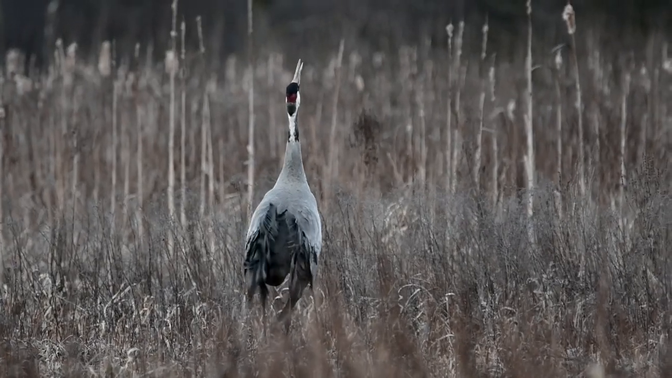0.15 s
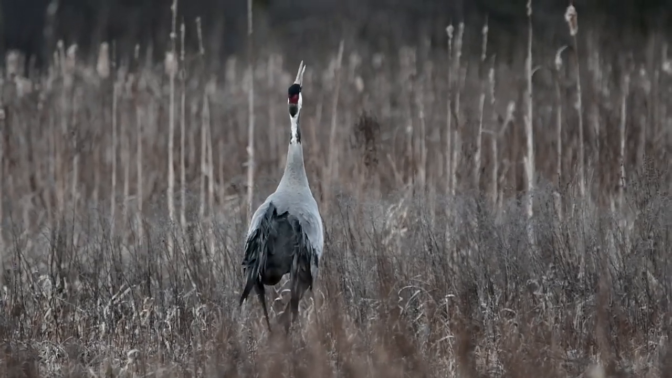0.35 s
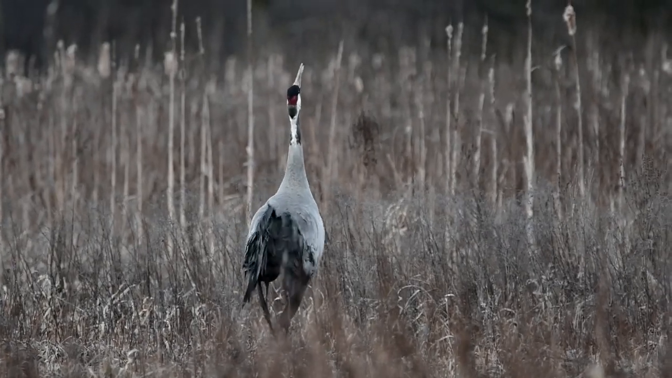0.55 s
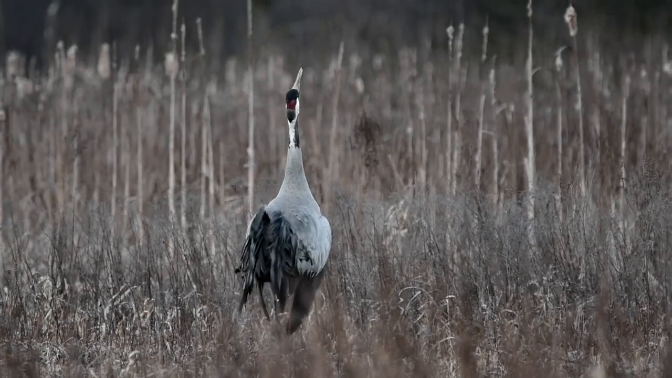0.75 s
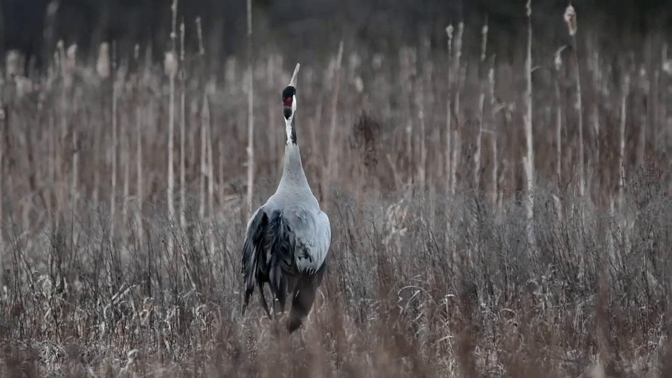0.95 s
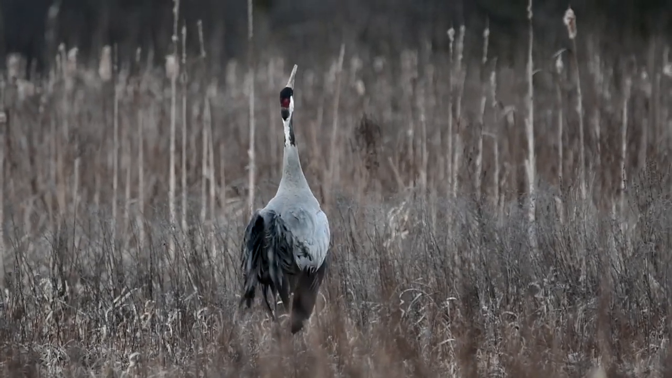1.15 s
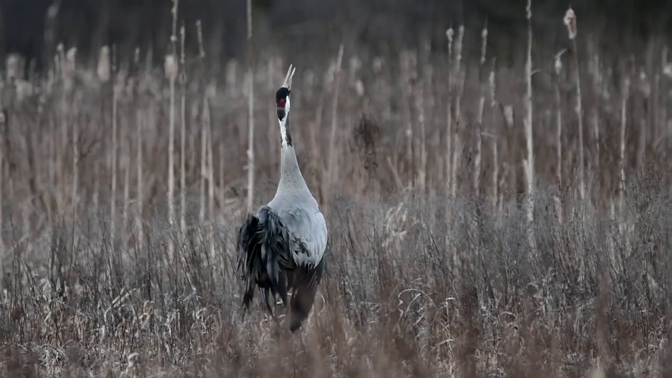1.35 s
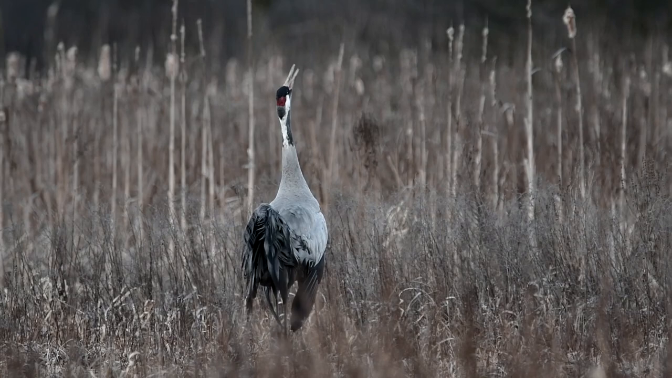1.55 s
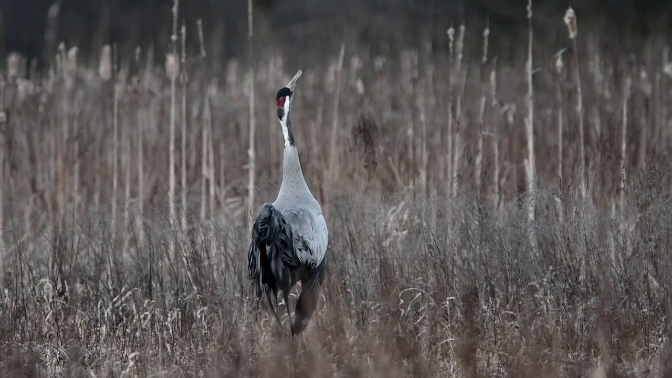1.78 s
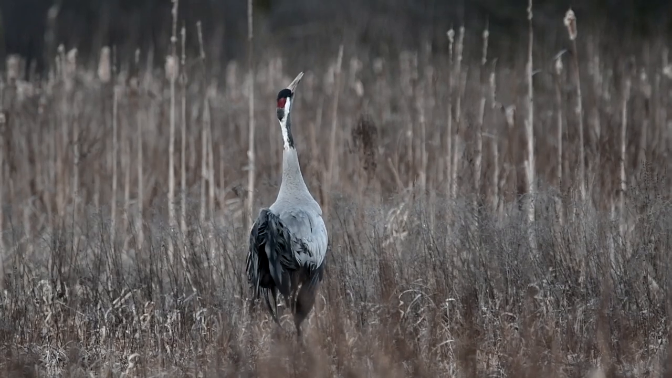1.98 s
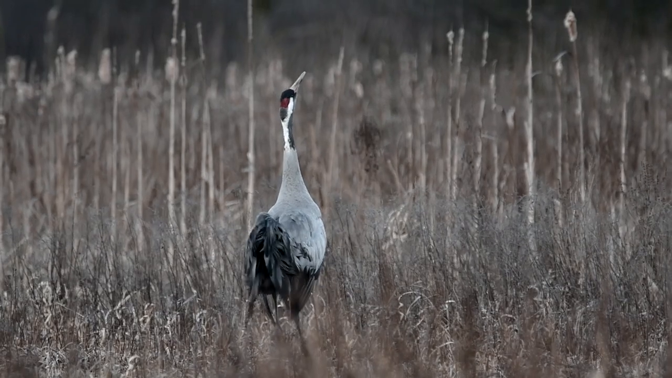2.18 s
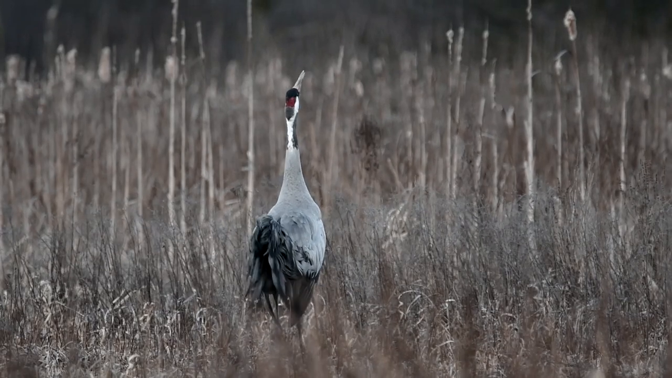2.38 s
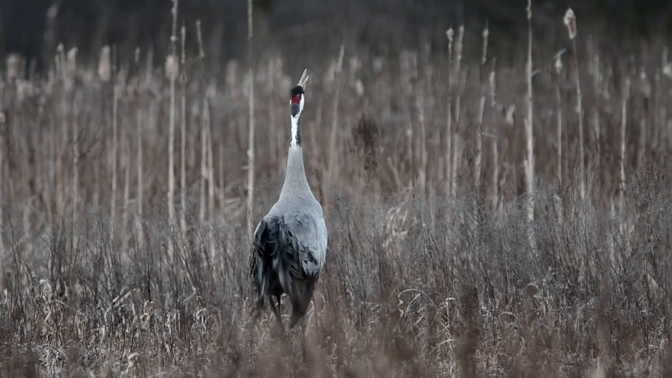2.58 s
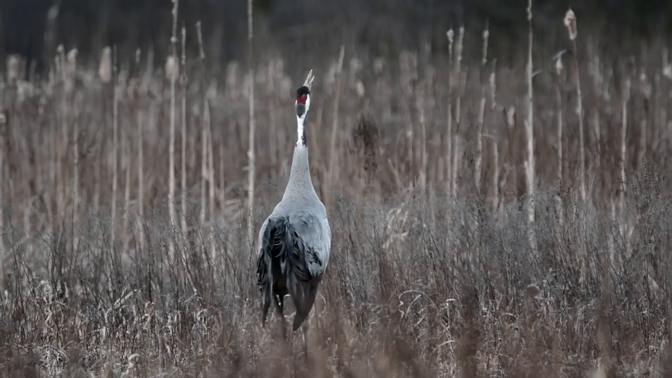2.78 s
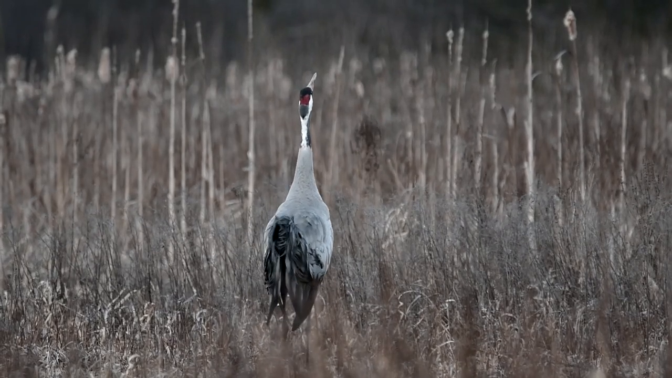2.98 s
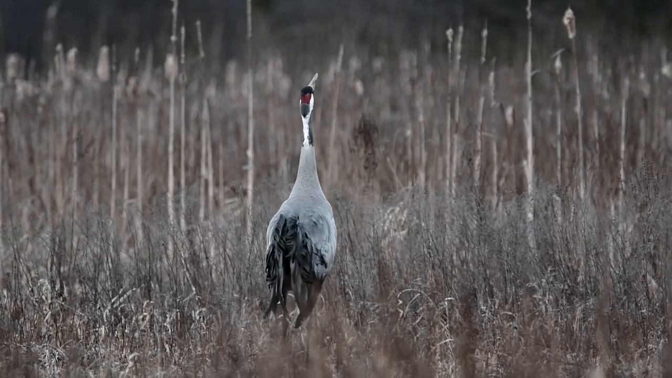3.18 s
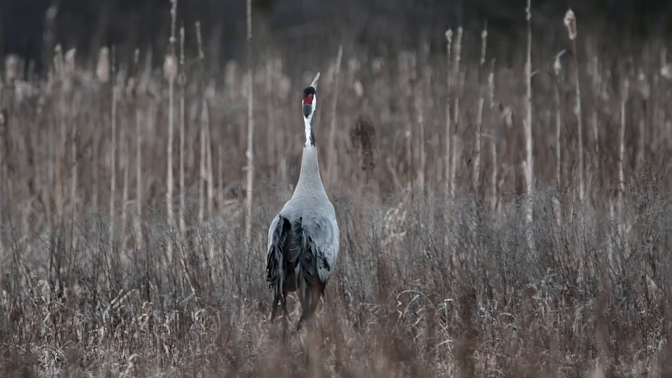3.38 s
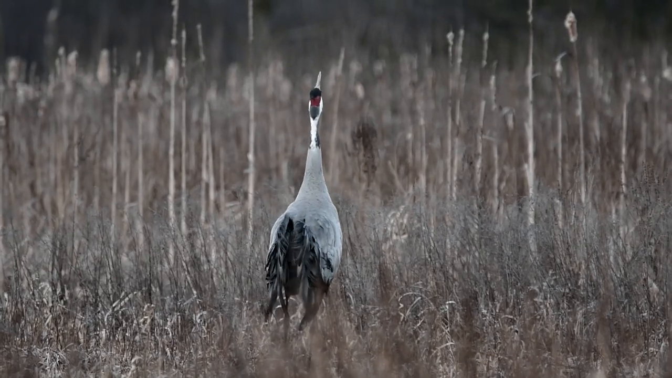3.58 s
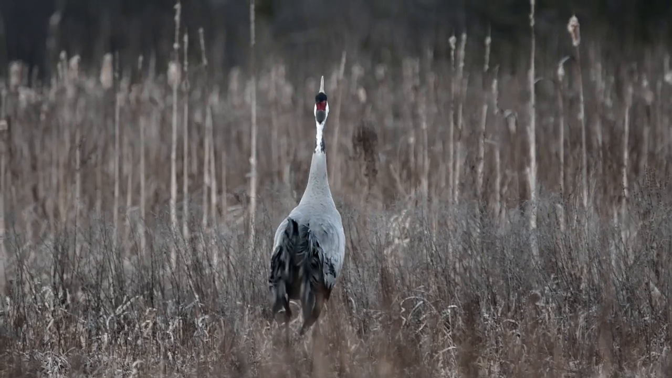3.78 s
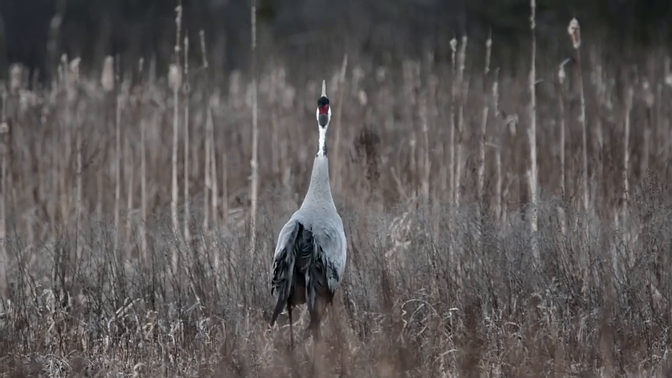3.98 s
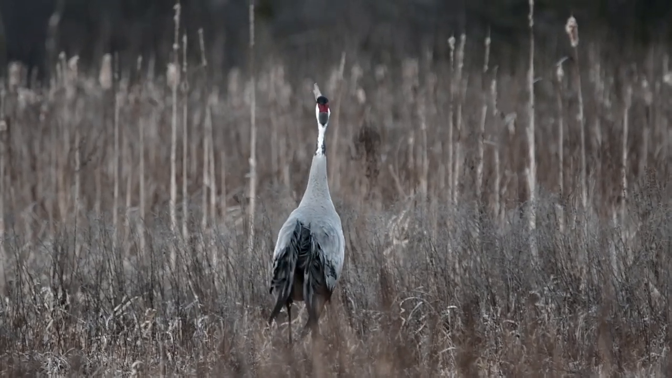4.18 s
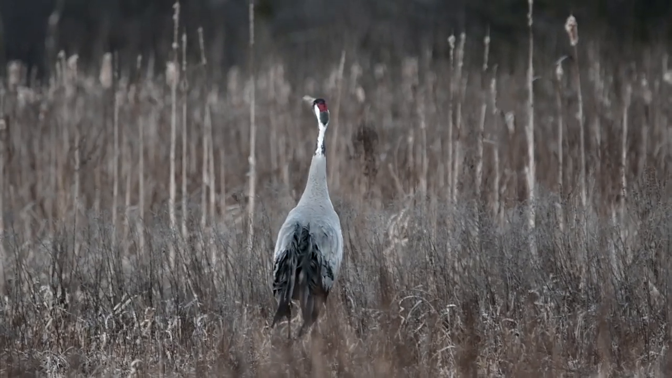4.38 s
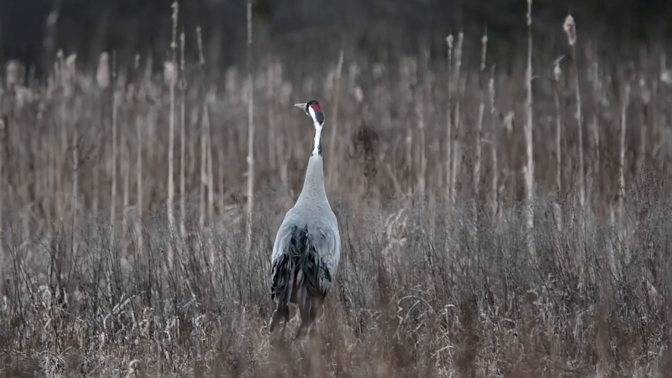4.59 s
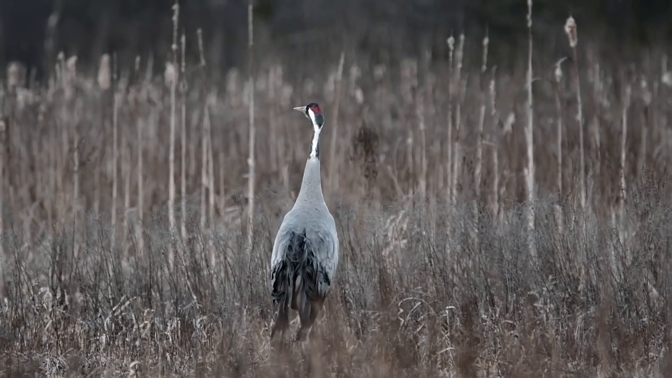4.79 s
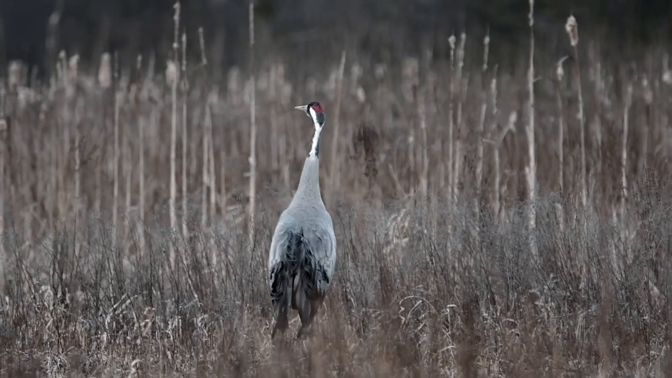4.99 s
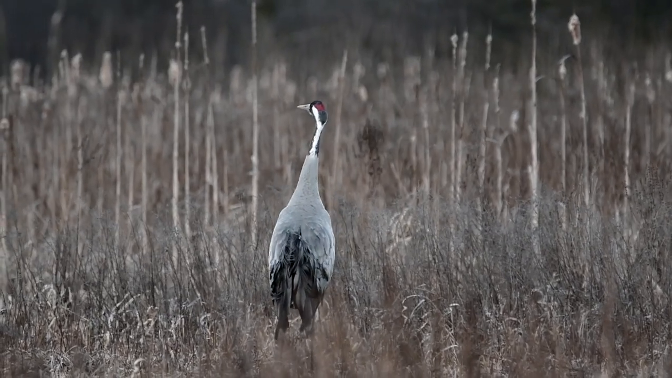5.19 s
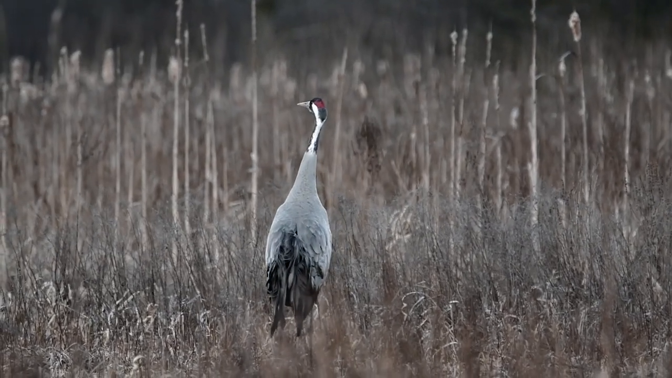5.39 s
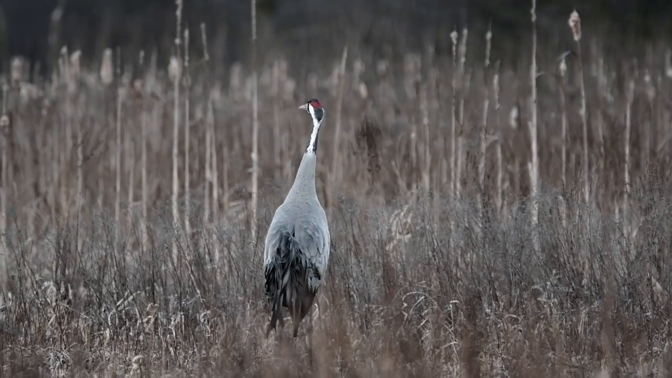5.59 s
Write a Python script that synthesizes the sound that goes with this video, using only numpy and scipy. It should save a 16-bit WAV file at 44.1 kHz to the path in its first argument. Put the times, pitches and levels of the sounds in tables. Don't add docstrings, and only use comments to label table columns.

```python
import sys
import numpy as np
from scipy import signal
from scipy.fft import rfft, irfft, next_fast_len
from scipy.io import wavfile
from scipy.ndimage import uniform_filter1d

SR = 44100
rng = np.random.default_rng(int(sys.argv[2]) if len(sys.argv) > 2 else 0)


def gain_from_db(level_db):
    decades = np.asarray(level_db, float) / 20
    return 10 ** decades


def log_audio(samples):
    frames = np.atleast_2d(samples).T
    limited = np.clip(frames, -1, 1)
    pcm = np.round(limited * 32767).astype(np.int16)
    wavfile.write(sys.argv[1], SR, pcm)


N = 249155

SHORT, CLIMB, HOLD, FALL = range(4)
# (start [s], end [s], settling time [s], hoarseness [0-1], stage)
MALE_STAGES = [(-.03, .068, .01, .06, CLIMB), (.068, .128, .004, .5, HOLD), (.218, .5, .022, .05, HOLD),
               (.5, .607, .004, .6, FALL), (1.104, 1.272, .014, .07, SHORT),
               (1.338, 1.402, .02, .55, CLIMB), (1.402, 1.502, .004, .06, HOLD),
               (1.502, 1.726, .004, .43, FALL), (2.322, 2.505, .022, .16, SHORT),
               (2.587, 2.645, .008, .85, CLIMB), (2.645, 2.722, .004, .5, HOLD),
               (2.722, 2.912, .004, .52, FALL), (3.598, 3.785, .04, .2, SHORT),
               (3.872, 3.964, .016, .12, CLIMB), (3.964, 4.03, .003, .28, HOLD),
               (4.03, 4.24, .004, .7, FALL)]
# (pitch [Hz], 2nd partial [dB], then fundamental, 3rd and 4th relative to it [dB])
MALE_VOICE = [(826, -36.5, -13.5, -8.5, -7), (880, -38.5, -3.5, 2, -7), (918, -31, -7.5, 2, -10),
              (817.7, -36, -7.5, -8.5, -5.5), (839.7, -35.5, -9.5, -12.5, -3), (861, -36, -4.5, -11.5, -11),
              (903.6, -28.5, -11, -19, -12.5), (834.6, -32.5, -6.5, -9.5, -7.5),
              (812.6, -38, -11, -13, -6.5), (843, -41, -8, -7.5, -11), (927, -35, -1.5, -5, -16),
              (866, -33.5, -5.5, -17.5, -13.5), (802, -40.5, -10.5, -7.5, -7.5),
              (838, -31.5, -17, -23.5, -7), (920, -29.5, -8, -8, -13.5), (834, -37, -8.5, -13, -9)]
BILL_OPENING = [0.8, 1.1, -0.8, -0.81, 0.19, -.8, -3.3, -1.1, 0.34, -2, -2.4, -2.6, 0.71, -2.2, -0.66, -1.5]
# (frequency [Hz], level [dB])
MALE_ROLLOFF = [(3000, -34.5), (4000, -3.5), (4900, -7), (5700, -9.5), (6500, -13), (7300, -26),
                (8500, -31.5), (11000, -43)]
# (starts flat by [Hz], catches up in [s], droops over the stage [Hz], final sag [Hz], sag time [s])
STAGE_PITCH = [(100, .04, 55, 70, 0.013), (72.8, 0.018, 0.1, 0.1, .01), (17.78, 0.0012, 22, 8, .008),
               (0.1, .01, 58, 16, .01)]
STAGE_DROOP_POWER = [5, 1, 1, 1]
# (swells in from [dB], tires over the stage [dB], final fade [dB], fade time [s])
STAGE_EFFORT = [(9.5, 1, 14, 0.012), (12, 0.8, -1.3, .01), (10, 5.5, 0.5, .01), (2, 6, 10, 0.018)]
STAGE_HOARSENESS = [(.6, 0, .55), (.4, 0, 0), (.55, .06, .1), (0, .22, 0)]
# (still shut at the start [dB], closes over the stage [dB])
STAGE_BILL = [(6.6, 0.6), (0.3, -0.79), (0.3, 1), (0.1, 2.3)]
# (slips [per s], slows by when hoarse [per s], depth [dB], extra depth once very hoarse [dB])
STAGE_STUMBLE = [(68, 0, 7, 0), (68, 0, 7, 0), (68, 0, 7, 0), (74, 40, 4.5, 16)]
# (frequency [Hz], width [Hz])
WINDPIPE_DIPS = [(1240, 260), (2060, 170)]
# (time [s], peak level [dB], pitch [Hz])
RATTLE_PULSES = [
    (0.61, -39.5, 750),
    (1.729, -25.5, 781),
    (1.756, -28.5, 770),
    (2.919, -25, 775),
    (2.939, -29.5, 817),
    (2.983, -32.5, 742),
    (3.001, -34.5, 780),
    (4.255, -39, 763),
    (4.295, -31.5, 760),
    (4.314, -31.5, 705),
]
RATTLE_PARTIALS = [-3, 0, -18.5, -9, -23.5, -29, -27]
# (onset [s], pitch locks [s], pitch collapses [s], top pitch [Hz])
FEMALE_NOTES = [(.112, .135, .265, 1117), (.385, .412, .49, 1104), (.668, .698, .755, 1100),
                (1.265, 1.292, 1.42, 1115), (1.54, 1.57, 1.645, 1103), (1.828, 1.85, 1.913, 1099),
                (2.485, 2.518, 2.642, 1111), (2.77, 2.8, 2.885, 1103), (3.07, 3.09, 3.152, 1096),
                (3.775, 3.8, 3.93, 1111), (4.045, 4.07, 4.145, 1101), (4.332, 4.355, 4.408, 1092)]
# (onset [dB], fundamental [dB], 2nd partial [dB], 3rd partial [dB], tail [dB])
FEMALE_LEVELS = [(-39.5, -35.5, -41, -43, -44), (-37.5, -36, -43.5, -46, -44.5),
                 (-38.5, -40, -39.5, -45, -48.5), (-39, -35.5, -42, -48, -42.5),
                 (-42.5, -35.5, -38, -50.5, -43.5), (-37.5, -37.5, -39.5, -47, -44.5),
                 (-37.5, -34.5, -33, -45, -43), (-43.5, -35, -36.5, -46, -44),
                 (-36, -34.5, -35.5, -43.5, -43), (-37.5, -35, -46, -50.5, -42.5),
                 (-38.5, -37.5, -41.5, -49.5, -42), (-40, -39.5, -39, -49.5, -48)]
FEMALE_UPPER = [-11, -20.5, -12.5, -46, -53]
STUTTER_PARTIALS = [-50, 6.5, -9.5, -4.5, -31, -8.5, -22.5, -21.5]
DOUBLED_PARTIALS = [-46, 0, -5.5, -6.5, -31.5, -25.5, -16, -29]
# (time [s], length [s], from pitch [Hz], to pitch [Hz], level [dB])
PEEPS = [
    (3.33, 0.045, 5840, 6160, -69),
    (3.36, 0.034, 6200, 6500, -59),
    (3.444, 0.056, 6000, 6100, -64),
    (3.492, 0.039, 6100, 6660, -61),
    (5.52, 0.13, 1690, 1490, -61),
]
# (time [s], peak level [dB], frequency [Hz])
WIND_TAPS = [(1.061, -49, 137), (1.268, -53, 91.5), (1.78, -51, 143), (1.954, -45.5, 90),
             (1.997, -44.5, 200), (2.143, -38.5, 217), (2.178, -36.5, 201), (2.205, -39.5, 212),
             (2.364, -44, 242), (3.608, -49, 140), (4.098, -42, 145), (4.139, -40.5, 159),
             (4.854, -47, 148), (4.888, -50, 103), (5.113, -43, 202)]
# (time [s], peak level [dB])
REED_SNAPS = [
    (2.9015, -39),
    (3.2166, -46),
    (5.169, -41),
]
# (time [s], level [dB], width [s])
WIND_SWELLS = [
    (.75, -79, .3),
    (1.6, -65.5, 0.85),
    (2.2, -63.5, 0.18),
    (3.2, -64, 0.67),
    (4.05, -59.5, .22),
    (4.6, -66, 0.47),
    (5.15, -62, 0.12),
]
# (frequency [Hz], level [dB per Hz])
WASH_SPECTRUM = [(18, -17.5), (209, -7.5), (800, -9.5), (1590, -13.5), (3230, -19), (6300, -20.5),
                 (7040, -25), (9150, -65.5)]
# (frequency [Hz], likeness [0-1])
WASH_LIKENESS = [(60, 0.985), (150, .995), (390, 0.98), (1010, 0.49), (2570, 0), (6590, 0)]
# (frequency [Hz], level [dB per Hz])
HISS_SPECTRUM = [(3000, -47.5), (7000, -12.5), (9000, -7.5), (12000, -12), (15600, -18), (15900, -56.5)]
# (frequency [Hz], width [Hz])
TREBLE_DIPS = [(7700, 380), (9600, 690)]


def syrinx(hz, partials_db, hoarse, stumble_hz, swing, scatter, throb_db):
    uneven = 1 + .4 * np.clip(band(8, 40)[0], -2, 2)
    cycle = 2 * np.pi * np.cumsum(stumble_hz * uneven) / SR
    wobble = swing * (1 + 0.33 * band(11, 40)[0]) * np.sin(cycle)
    wobble = wobble + scatter * np.clip(band(40, 372)[0], -2, 2)
    tremor = 0.0031 * band(9, 49)[0]
    phase = 2 * np.pi * np.cumsum(hz * (1 + hoarse * wobble + tremor)) / SR
    tone = sum(gain_from_db(db) * np.sin((k + 1) * phase) for k, db in enumerate(partials_db))
    depth = throb_db * hoarse * np.clip(1 + 0.22 * band(5.5, 40)[0], 0, 2)
    return np.sqrt(2) * tone * gain_from_db(depth * (1.2165 - (1 - np.cos(cycle)) ** 2 / 2))


def male():
    t, rows = np.arange(N) / SR, np.array(MALE_STAGES)
    now = np.searchsorted((rows[:-1, 1] + rows[1:, 0]) / 2, t)
    start, end, settle, hoarse, stage = rows[now].T
    stage = stage.astype(int)
    top, second, first, third, fourth = np.array(MALE_VOICE)[now].T
    flat, catch, droop, sag, sag_s = np.array(STAGE_PITCH)[stage].T
    swell, tire, fade, fade_s = np.array(STAGE_EFFORT)[stage].T
    shaky, growing, failing = np.array(STAGE_HOARSENESS)[stage].T
    shut, closing = np.array(STAGE_BILL)[stage].T
    slips, slowing, depth, extra = np.array(STAGE_STUMBLE)[stage].T

    since, left = np.maximum(t - start, 0), np.maximum(end - t, 0)
    done = np.minimum(since / (end - start), 1)
    hz = top - flat * np.exp(-since / (catch + settle)) - sag * np.exp(-left / sag_s)
    hz = hz - droop * done ** np.array(STAGE_DROOP_POWER)[stage]
    weakening = tire * done + fade * np.exp(-left / fade_s)
    level = second - swell * np.exp(-since / settle) - weakening
    hoarse = hoarse + shaky * np.exp(-(since / settle) ** 2 / 2) + growing * done + failing * np.exp(-left / .015)
    bill = np.array(BILL_OPENING)[now] - shut * np.exp(-since / (2.7 * settle)) - closing * done
    slips = slips - slowing * done * hoarse
    depth = depth + extra * np.maximum(hoarse - .55, 0)

    sounding = 1. * (t > start) * (t < end)
    fundamental = level + first + .4 * weakening
    curves = [sounding, hz, hoarse, bill, fundamental, level, level + third, level + fourth]
    gate, hz, hoarse, bill, *low = uniform_filter1d(curves, size=300)
    upper = [low[-1] + at_hz(MALE_ROLLOFF, k * hz) + bill * (k - 4) for k in range(5, 14)]
    throb_db = uniform_filter1d(depth, size=300)
    return gate * syrinx(hz, low + upper, hoarse, stumble_hz=slips, swing=.058, scatter=.062, throb_db=throb_db)


def rattle():
    out, t = np.zeros(N), np.arange(3500) / SR
    shape = t / .0042 * np.exp(1 - t / .0042)
    slips = rng.standard_normal((len(RATTLE_PULSES), len(t)))
    for (s, db, hz), slip in zip(RATTLE_PULSES, slips):
        phase = 2 * np.pi * np.cumsum(hz * (1 + .9 * uniform_filter1d(slip, size=70))) / SR
        burst = shape * sum(gain_from_db(d) * np.sin((k + 1) * phase) for k, d in enumerate(RATTLE_PARTIALS))
        ring = gain_from_db(-14) * np.sin(2 * np.pi * .95 * hz * t) * np.minimum(t / 0.0037, 1) * np.exp(-t / .028)
        out[round(s * SR):][:len(t)] += gain_from_db(db - 3.5) * (burst + ring)
    return out


def female():
    t = np.arange(N) / SR
    note = np.clip(np.searchsorted(np.array(FEMALE_NOTES)[:, 0] - .01, t) - 1, 0, None)
    onset, lock, fall, top = np.array(FEMALE_NOTES)[note].T
    onset_db, first, second, third, tail_db = np.array(FEMALE_LEVELS)[note].T
    since, left = t - lock, np.maximum(fall - t, -.004)

    arch = top + 5 - 16 * np.exp(-np.maximum(since, -.02) / .012)
    arch = arch - 22 * np.exp(-left / .03) - 45 * np.exp(-left / .006)
    locked = np.clip(np.minimum(since / .008 + 1, (fall - t) / .004 + 1), 0, 1)
    dulling = -14 * np.exp(-left / 0.0067)
    settling = 0.023 + 0.97 * np.exp(-np.maximum(since, 0) / 0.026)
    force_db = 0.62 * (first + 36)
    partials = [first, second, third + dulling / 2] + [third + dulling + force_db + db for db in FEMALE_UPPER]
    clean = syrinx(arch, partials, settling, stumble_hz=85.4, swing=0.0072, scatter=0.022, throb_db=2.0)

    pulses = .3 + .7 * np.abs(np.sin(np.pi * (t - onset) / .0125))
    pulses = pulses * np.clip((t - onset) / .008, 0, 1) * np.clip(-since / .004, 0, 1)
    rising_hz = 498 + 1300 * np.clip(t - onset, 0, .03)
    opening = syrinx(rising_hz, STUTTER_PARTIALS, 1, stumble_hz=80, swing=.01, scatter=.045, throb_db=0)

    dying = gain_from_db(tail_db - 520 * np.maximum(t - fall - .015, 0)) * np.clip((t - fall) / .004, 0, 1)
    falling_hz = 458 + 55 * np.exp(-np.maximum(t - fall, 0) / .008)
    tail = syrinx(falling_hz, DOUBLED_PARTIALS, 1, stumble_hz=125, swing=.02, scatter=.045, throb_db=6.0)
    return locked * clean + gain_from_db(onset_db) * pulses * opening + dying * tail


def placed(x, pan_db, lead, bounce, bounce_lag):
    i = np.arange(N)
    late = bounce * np.interp(i - bounce_lag, i, x)
    left = gain_from_db(pan_db / 2) * np.interp(i + lead / 2, i, x + late)
    right = gain_from_db(-pan_db / 2) * np.interp(i - lead / 2, i, x - late)
    return np.array([left, right])


def trees(x):
    echo_db, t60_s, delay_s = -26.5, 1.7, .07
    t = np.arange(SR) / SR
    far = gain_from_db(-60 * t / t60_s) * np.clip(t / delay_s, 0, 1)
    near = 2.5 * np.exp(-t / .012)
    tail = rng.standard_normal((3, SR)) * (far + near)
    tail = signal.sosfilt(signal.butter(1, 1800, fs=SR, output="sos"), tail[0] + 2.1 * tail[1:])
    wet = signal.fftconvolve(x[None], tail / np.sqrt(np.sum(tail[0] ** 2)), axes=1)[:, :N]
    return gain_from_db(echo_db + 2.1 * band(1.8, 40)) * wet


def far_birds():
    out, t = 0, np.arange(N) / SR
    waver = 1 + 0.0096 * band(24, 120)[0]
    for s, length, from_hz, to_hz, db in PEEPS:
        done = np.clip((t - s) / length, 0, 1)
        hz = (from_hz + (to_hz - from_hz) * done) * waver
        out = out + gain_from_db(db) * np.sin(np.pi * done) * np.sin(2 * np.pi * np.cumsum(hz) / SR)
    return out


def wind_taps():
    out, t = np.zeros(N), np.arange(2200) / SR
    for s, db, hz in WIND_TAPS:
        thump = np.sin(2 * np.pi * hz * t) * np.exp(-((t * hz - 1.1) / 0.65) ** 2)
        out[round(s * SR):][:len(t)] += gain_from_db(db) * thump
    return out


def reed_snaps():
    out, t = np.zeros(N), np.arange(2200) / SR
    softened = signal.butter(3, 6500, fs=SR, output="sos")
    for (s, db), snap in zip(REED_SNAPS, rng.standard_normal((len(REED_SNAPS), len(t)))):
        out[round(s * SR):][:len(t)] += gain_from_db(db - 6.5) * signal.sosfilt(softened, snap) * np.exp(-t / 0.0084)
    return out


def air():
    t = np.arange(N) / SR
    alike = lambda hz: np.clip(at_hz(WASH_LIKENESS, hz), 0, 1)
    wash = gain_from_db(-58.5) * gain_from_db(.7 * band(1, 6)) * coloured(WASH_SPECTRUM, alike)
    swells = sum(gain_from_db(db) * np.exp(-((t - s) / width) ** 2) for s, db, width in WIND_SWELLS)
    wind = swells * gain_from_db(1.3 * band(1.7, 20)) * band(67, 220)
    hiss = gain_from_db(-76) * coloured(HISS_SPECTRUM, lambda hz: 0 * hz)
    return wash + wind + hiss


def coloured(spectrum, alike):
    size = next_fast_len(N)
    hz = np.fft.rfftfreq(size, 1 / SR)
    mid, side = rfft(rng.standard_normal((2, size))) * gain_from_db(at_hz(spectrum, hz))
    both = np.sqrt(1 + alike(hz)) * mid + np.sqrt(1 - alike(hz)) * side * [[1], [-1]]
    return rms_one(irfft(both, size)[:, :N])


def band(low_hz, high_hz, channels=1):
    sos = signal.butter(2, [low_hz, high_hz], "band", fs=SR, output="sos")
    return rms_one(signal.sosfilt(sos, rng.standard_normal((channels, N + 9000)))[:, 9000:])


def rms_one(x):
    return x / np.sqrt(np.mean(x ** 2) + 1e-20)


def at_hz(points, hz):
    point_hz, value = np.array(points).T
    return np.interp(np.log(hz + 1e-9), np.log(point_hz), value)


def dips(x, points):
    for hz, width in points:
        x = signal.lfilter(*signal.iirnotch(hz, hz / width, fs=SR), x)
    return x


def scene():
    voice_high_pass = signal.butter(6, 640, "high", fs=SR, output="sos")
    he = signal.sosfilt(voice_high_pass, dips(male() + rattle(), WINDPIPE_DIPS))
    she = signal.sosfilt(voice_high_pass, female())
    pair = placed(he, 0.53, 0.99, bounce=0.2, bounce_lag=12.14)
    pair = pair + placed(she, -2.2, 2.88, bounce=0.15, bounce_lag=3.1)
    return pair + trees(he + she) + far_birds() + wind_taps() + reed_snaps() + air()


def low_pass(x):
    return signal.sosfilt(signal.butter(12, 15720, fs=SR, output="sos"), x)


def record(dry):
    mix = dips(dry, TREBLE_DIPS + TREBLE_DIPS)
    return low_pass(mix)


dry = scene()
out = record(dry)
log_audio(out)
```